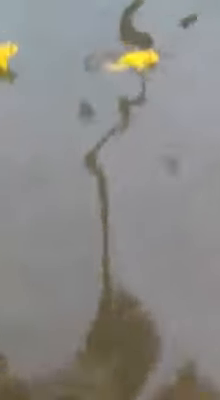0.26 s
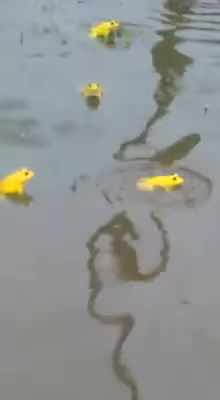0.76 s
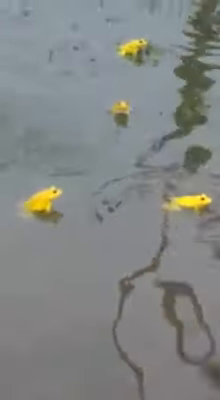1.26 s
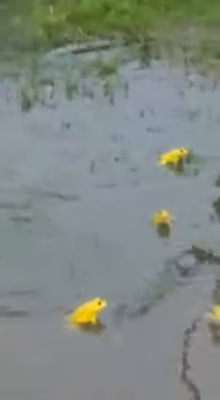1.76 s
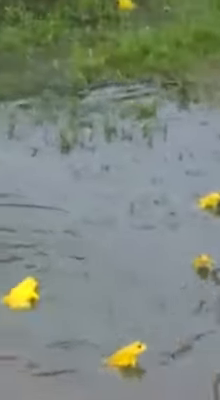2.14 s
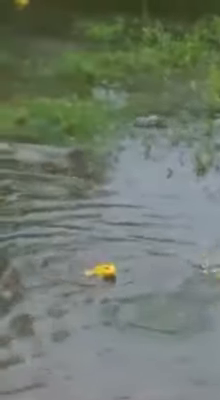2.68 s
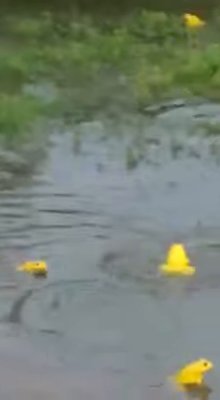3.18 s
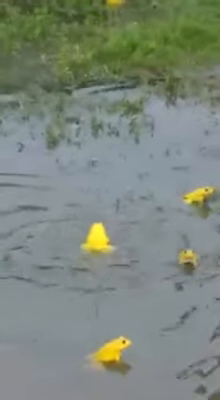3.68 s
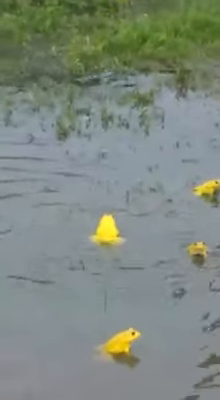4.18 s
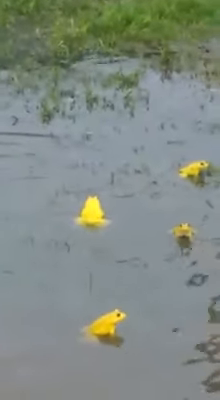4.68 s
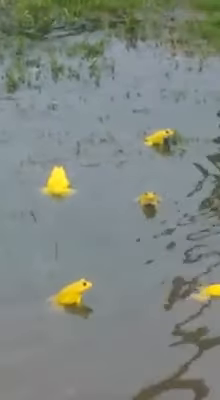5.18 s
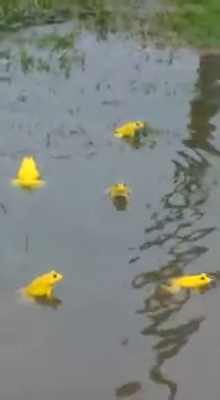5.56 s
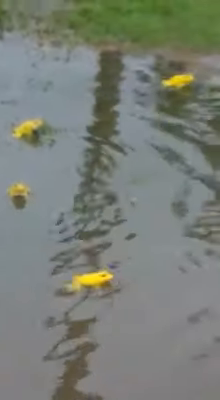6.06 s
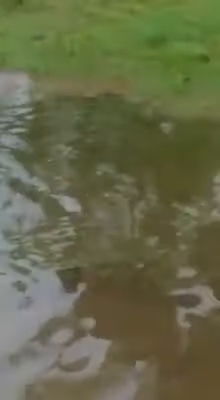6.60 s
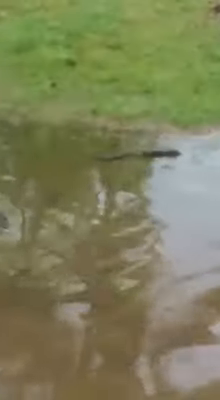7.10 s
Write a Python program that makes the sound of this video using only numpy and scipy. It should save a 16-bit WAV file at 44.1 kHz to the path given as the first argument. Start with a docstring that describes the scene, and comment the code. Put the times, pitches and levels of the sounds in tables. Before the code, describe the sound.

Rough, pulsing frog croaks trade back and forth over shallow water, multiplying into a loud crowded chorus, with faint chirps and hiss behind.

```python
"""Bullfrogs call in a rain-flooded puddle: harsh and round voices trade croaks, and more join as the chorus builds.
Each croak is a slowing train of pulses that ring the throat and vocal sac; farther frogs blur together behind.
A deeper voice throbs underneath in even bouts of short, upward-bending tones.
Frogs splash as they jump, in bursts of crackling noise; raspy chirps, whistles and one long tone come from far off.
Low outdoor air and a thin high hiss over the wet grass are shaped noise."""
import sys
import numpy as np
from scipy import signal
from scipy.fft import rfft, irfft, next_fast_len
from scipy.io import wavfile
from scipy.ndimage import map_coordinates

SR = 44100
rng = np.random.default_rng(int(sys.argv[2]) if len(sys.argv) > 2 else 0)


def to_wav(sig):
    """Store sig (one row per channel, or 1-D mono) as 16-bit WAV at the path in sys.argv[1].

    Samples outside -1..1 are clipped; the rate is SR.
    """
    pcm = np.clip(np.atleast_2d(sig), -1, 1) * 32767
    pcm = np.round(pcm).astype(np.int16)
    wavfile.write(sys.argv[1], SR, pcm.T)  # frames by channels


N = 323694  # length in samples


def amp(db):
    """Amplitude factor for a level in dB."""
    return 10 ** (np.asarray(db) / 20)


def unit(x):
    """Scaled to rms 1."""
    return x / np.sqrt(np.mean(x ** 2) + 1e-20)


def along(points, hz):
    """Read a curve of (Hz, value) points on a log frequency axis."""
    point_hz, value = np.transpose(points)
    return np.interp(np.log(hz + 1), np.log(point_hz + 1), value)


def clock(length_s):
    """Sample times over a length in seconds."""
    return np.arange(int(length_s * SR)) / SR


def curves(rows):
    """One value per sample for each column after the time."""
    time_s, *columns = np.transpose(rows)
    return [np.interp(np.arange(N) / SR, time_s, column) for column in columns]


def wobble(rate):
    """A smooth random curve, rate knots a second."""
    knots = rng.standard_normal(int(N * rate / SR) + 4)
    return map_coordinates(knots, [np.arange(N) * rate / SR])


def filtered(x, response):
    """x times a complex response of frequency."""
    m = next_fast_len(N + SR // 4)
    spectrum = rfft(x, m) * response(np.fft.rfftfreq(m, 1 / SR))
    return irfft(spectrum, m)[..., :N]


def add(track, start_s, sound):
    """Mix a sound into a track from a start time."""
    start = int(np.clip(round(start_s * SR), 0, N))
    track[..., start:start + sound.shape[-1]] += sound[..., :N - start]


def noise(spectrum, apart_db):
    """Stereo noise of rms 1; apart_db is the part that differs between the sides."""
    mid, side = filtered(rng.standard_normal((2, N)), lambda hz: amp(along(spectrum, hz)))
    side = amp(apart_db) * side
    return unit(np.array([mid + side, mid - side]))


def outdoors(x, near_db, near_t60, far_db, far_t60, apart_db=-8):
    """Direct sound, quick scatter from water and bank, and a faint tail from the trees; t60 in s."""
    t = clock(.3)

    def scatter(t60):
        decay = amp(-60 * t / t60) * (t > .001)
        return unit(rng.standard_normal(len(t)) * decay) / np.sqrt(len(t))

    mid, side = [amp(near_db) * scatter(near_t60) + amp(far_db) * scatter(far_t60) for _ in range(2)]
    path = (t == 0) + mid + np.outer([1, -1], amp(apart_db) * side)
    path = path / np.sqrt(np.sum(path ** 2) / 2)
    return signal.fftconvolve(x[None], path, axes=1)


# Spectral shape of the low outdoor air: frequency_hz, relative_density_db (per Hz)
AIR_SPECTRUM = [(25, -16.5), (60, -5), (110, -4), (180, -9), (280, 4.5), (440, -0.5), (620, -8.5),
                (1000, -9.5), (2000, -6), (3400, -14), (4200, -28), (6000, -74)]
# Spectral shape of the thin hiss: frequency_hz, relative_density_db (per Hz)
HISS_SPECTRUM = [(2500, -75), (4300, -5.5), (6700, 1.5), (7900, -7), (8600, 6), (9350, 11.5), (10200, 1),
                 (11400, -15.5), (12700, -10), (15000, -22)]


def background(air_db=-46, hiss_db=-54):
    """Low outdoor air whose level drifts gently, and a steady high hiss."""
    drift_db = 1.0 * wobble(6)
    air = amp(air_db + drift_db) * noise(AIR_SPECTRUM, apart_db=-7.5)
    hiss = amp(hiss_db) * noise(HISS_SPECTRUM, apart_db=-0.5)
    return air + hiss


def croak(length, first_rate, slowing, throat_hz, throat_width, sag, sac_hz, sac_db,
          hollow_db, bright_db, edge_db,
          sac_width=150, sac_sag=0.095, hollow_width=360, bright_width=490):
    """Slowing pulses swell and fade; each rings the sac and a throat whose pitch slides as the air runs out."""
    swell, size_db, stray, jitter_s = .5, 1.35, .014, .0001
    puff, puff_lead_s, sac_lead_s = .55, .0027, .0025
    pulse = np.arange(int(length * first_rate * (1 - slowing / 2)))
    # place in the croak, 0 to 1, at which each pulse falls when the rate drops steadily
    u = (1 - np.sqrt(np.abs(1 - 2 * slowing * pulse / (first_rate * length))))[:, None] / slowing
    late, size, bend, gap, kick = rng.standard_normal((64, 5))[:len(pulse)].T[:, :, None]
    effort = np.abs(np.sin(np.pi * u)) ** swell * amp(size_db * size)
    t = clock(.02)

    def ring(hz, width, db, growth):
        """One soft-edged ring per pulse; growth says how steeply it follows the effort."""
        x = 4 * width * t
        shape = x ** 2 * np.exp(-x)
        shape = shape * np.sqrt(2 * SR / first_rate / np.sum(shape ** 2))
        return amp(db) * effort ** growth * shape * np.sin(2 * np.pi * hz * t)

    slide = 1 + sag * (.5 - u) + stray * bend
    # hollow, throat and two bright resonances: centre_hz, width_hz, level_db, growth
    modes = [(0.704 * throat_hz, hollow_width, hollow_db, 1.05),
             (throat_hz, throat_width, 0, 1),
             (1.267 * throat_hz, bright_width, bright_db, 1.05),
             (3120, 700, edge_db, 1.3)]
    throat = sum(ring(hz * slide, width, db, growth) for hz, width, db, growth in modes)
    sac_slide = 1 + sac_sag * (.5 - u) + 2 * stray * gap
    sac = ring(sac_hz * sac_slide, sac_width, sac_db, growth=0.56)

    opening = u * length + jitter_s * late
    # a usually weaker puff leaks out just before each opening
    puff_at = opening - puff_lead_s * np.exp(0.22 * gap)
    sac_at = opening - sac_lead_s + 2 * jitter_s * bend
    at = np.vstack([opening, puff_at, sac_at])
    sounds = np.vstack([throat, puff * kick * throat, sac])
    places = (np.abs(at + t) * SR + .5).astype(int)
    return np.bincount(places.ravel(), sounds.ravel(), int((length + .05) * SR))


def radiated(x, low_hz=255, high_hz=3500):
    """A frog's small body sends out little bass, and its soft skin little treble."""
    x = signal.sosfilt(signal.butter(N=4, Wn=low_hz, btype="high", fs=SR, output="sos"), x)
    return signal.sosfilt(signal.butter(N=10, Wn=high_hz, fs=SR, output="sos"), x)


# Swelling level of the farther frogs: time_s, level_db
CHORUS_LEVEL = [(0, -59), (1.6, -51.5), (3, -44.5), (3.6, -39.5), (4.4, -35), (5.2, -37.5), (6, -32.5),
                (6.6, -36.5), (7.34, -42)]


def far_frogs(count=44):
    """Farther frogs call at loosely spaced random times and blur into one another."""
    out = np.zeros((2, N))
    for i, (shift, pace, build) in enumerate(rng.uniform(-1, 1, (count, 3))):
        throat_hz = 1540 * (1 + .07 * build)
        call = croak(.34, 67 + 3 * pace, .11, throat_hz, throat_width=470, sag=0.3, sac_hz=394,
                     sac_db=-5.0, hollow_db=-3.0, bright_db=-1.5, edge_db=-18.5)
        start_s = (i + shift / 2) * N / SR / count
        add(out, start_s, outdoors(call, near_db=-2, near_t60=.04, far_db=-6, far_t60=.22, apart_db=-5))
    return unit(radiated(out)) * amp(curves(CHORUS_LEVEL)[0])


def chirp(length, hz, stray, size_db=2, fall=0.021):
    """A quick, slightly falling train of tiny rings that stray in pitch and blend into a rasp."""
    rate, ring_s = 310, .0015  # rings per s, ring width in s
    count = max(int(length * rate), 1)
    size, bend = rng.standard_normal((160, 2))[:count].T
    t = clock(count / rate)
    ring = np.minimum((t * rate).astype(int), count - 1)
    u = t * rate / count  # 0 to 1 through the chirp
    swell = np.sqrt(np.abs(np.sin(np.pi * u)))
    pulses = np.exp(-((t - (ring + .5) / rate) / ring_s) ** 2)
    level = swell * amp(size_db * size[ring]) * pulses
    pitch_hz = hz * (1 + fall * (.5 - u) + stray * bend[ring])
    return unit(level * np.sin(2 * np.pi * np.cumsum(pitch_hz) / SR))


def whistle(length, hz, waver=0.011, waver_rate=8, fall=0.01, companion=.915, companion_db=-3):
    """A clean note wavering in pitch, with a weaker tone just below it."""
    t = clock(length)
    u = t / length
    pitch_hz = hz * (1 + fall * (.5 - u) + waver * np.cos(2 * np.pi * waver_rate * t))
    phase = 2 * np.pi * np.cumsum(pitch_hz) / SR
    notes = np.sin(phase) + amp(companion_db) * np.sin(companion * phase)
    return unit(np.sqrt(np.sin(np.pi * u)) * notes)


# Far high chirps, and in the last row the short high plink of a drop at the splash: start_s, length_s,
# pitch_hz, pitch_scatter (share), level_db (before the shared trim)
FAR_CHIRPS = [(0, 0.086, 2940, .035, -50.5), (1.53, 0.18, 3490, 0.017, -59), (1.7, 0.27, 3280, 0.014, -53),
              (2.003, 0.21, 3426, 0.018, -54), (2.408, 0.24, 3500, 0.033, -52),
              (2.758, 0.21, 3410, 0.0089, -49.5), (3.127, 0.34, 3410, 0.008, -50),
              (3.576, 0.15, 3410, .012, -50), (4.026, 0.16, 3940, 0.037, -50.5),
              (4.036, 0.31, 3476, 0.0085, -52.5), (4.475, 0.2, 3880, 0.048, -52),
              (4.471, 0.17, 3450, .014, -50.5), (5.05, 0.21, 3940, 0.038, -53),
              (5.602, 0.2, 3880, .04, -48.5), (5.998, 0.15, 4300, 0.013, -56.5),
              (6.443, 0.079, 3440, 0.022, -39)]
# Far wavering whistles: start_s, length_s, pitch_hz, level_db (before the shared trim)
FAR_WHISTLES = [(0.972, 0.217, 3720, -52), (1.31, 0.18, 3680, -51)]
# Path of the thin distant tone, before its wavering: time_s, pitch_hz, level_db
LONG_TONE = [(3.65, 723, -82), (3.78, 704, -51), (4.1, 760, -56), (4.27, 783, -38.5), (4.42, 763, -51),
             (4.55, 766, -41.5), (4.8, 755, -44), (4.95, 728, -49.5), (5.1, 690, -80)]


def distant_calls(trim_db=-3):
    """Raspy high chirps, a drop's high plink and whistles smeared by distance, and one long tone wavering in
    pitch and level."""
    out = np.zeros(N)
    for start_s, length, hz, stray, db in FAR_CHIRPS:
        add(out, start_s, amp(db + trim_db) * chirp(length, hz, stray))
    for start_s, length, hz, db in FAR_WHISTLES:
        add(out, start_s, amp(db + trim_db) * whistle(length, hz))
    hz, db = curves(LONG_TONE)
    tone_level = amp(db + 2.4 * wobble(27))
    tone_hz = hz * (1 + 0.0092 * wobble(46))
    tone = tone_level * np.sin(2 * np.pi * np.cumsum(tone_hz) / SR)
    return outdoors(out, near_db=-3, near_t60=.06, far_db=-5, far_t60=.28)[:, :N] + tone


# Bouts of the deep voice: first_throb_s, last_throb_s, pitch_hz (mid-bout), level_db (before the arch)
DEEP_BOUTS = [(0.116, 0.307, 255, -44.5), (0.467, 0.87, 278, -37), (0.957, 1.196, 269, -37.5),
              (1.614, 1.613, 335, -40), (1.675, 1.675, 330, -29), (1.942, 2.17, 264, -37),
              (2.632, 2.89, 297, -34.5), (2.992, 3.407, 268, -36), (4.791, 5.112, 254, -38.5),
              (5.169, 5.72, 248, -44.5), (5.789, 6.23, 241, -39.5), (6.3, 6.934, 280, -35.5),
              (6.39, 6.86, 260, -40)]


def deep_frog(width=0.011, rise=0.1, overtone_db=-24, arch_db=3, sag=0.045):
    """Even bouts of soft throbs, each a few cycles bending upward; a bout swells midway and sinks in pitch."""
    throbs_per_s, jitter_s = 16.2, .0008  # the rate is rounded to fit whole throbs in a bout
    scatter_db, stray = 1, .012
    out = np.zeros(N)
    t = clock(.1) - .05
    for first, last, bout_hz, bout_db in DEEP_BOUTS:
        count = round((last - first) * throbs_per_s) + 1
        for u, (size, bend, late) in zip(np.linspace(0, 1, count), rng.standard_normal((20, 3))):
            hz = bout_hz * (1 + sag * (.5 - u) + stray * bend)
            db = bout_db + arch_db * np.sin(np.pi * u) + scatter_db * size
            phase = 2 * np.pi * hz * (t + rise * t ** 2 / (2 * width))
            tone = np.sin(phase) + amp(overtone_db) * np.sin(2 * phase)
            throb = np.exp(-(t / width) ** 2) * tone
            centre_s = first + u * (last - first) + jitter_s * late
            add(out, centre_s + t[0], amp(db) * throb)
    return outdoors(out, near_db=-12, near_t60=.08, far_db=-11, far_t60=.4)[:, :N]


def around_body(pair, turn, centre_hz=1480, width_hz=270):
    """Sound bending round the microphone body reaches the left port with its phase turned in one band."""
    m = next_fast_len(pair.shape[1])
    hz = np.fft.rfftfreq(m, 1 / SR)
    bend = turn * np.exp(-((hz - centre_hz) / width_hz) ** 2)
    return irfft(rfft(pair, m) * np.exp(1j * np.outer([1, 0], bend)), m)


# Kinds of voice by name, levels against the throat: throat_width_hz, throat_sag (share), sac_hz,
# hollow_db, bright_db, edge_db, port_phase_turn_rad
FROG_VOICES = {"harsh": (364, 0.24, 414.5, -10, -5.5, -17.5, 3),
               "round": (251, -0.01, 420.5, -16, -12, -36.5, 2),
               "hollow": (310, -0.03, 420, -4, -6, -19, 3), "falling": (262, 0.3, 410, -15, -9, -25, 1.5),
               "shrill": (300, 0.48, 416, -12, -4.5, -15.5, 3),
               "thin": (397, 0.44, 392, -11, -3.5, -7, 9.5),
               "booming": (324, 0.35, 345, -3.5, -3.5, -16.5, -8)}
# Croaks of the near frogs: start_s, length_s, voice, first_pulses_per_s, slowing (share of that rate
# lost by the end), throat_hz, level_db, sac_db (against the throat)
NEAR_CROAKS = [(0.204, 0.23, "thin", 70, 0.13, 1660, -51.5, -5),
               (0.343, 0.22, "round", 63, .11, 1350, -48.5, 6),
               (0.637, 0.26, "thin", 70, .11, 1680, -45.5, 0),
               (0.735, 0.26, "thin", 62, 0.12, 1610, -45.5, -2.5),
               (0.979, 0.23, "round", 56, 0.1, 1500, -56, -2.5),
               (1.158, 0.28, "harsh", 83, .11, 1850, -44, -2.5),
               (1.389, 0.22, "round", 76, 0.12, 1760, -49.5, 1.5),
               (1.788, 0.24, "harsh", 67.5, 0.11, 1635, -35, -10),
               (1.958, 0.23, "round", 86, 0.094, 1670, -45.5, -0.5),
               (2.2, 0.24, "harsh", 70.5, 0.1, 1680, -34.5, -10),
               (2.436, 0.22, "falling", 66.5, .065, 1570, -33, -8.5),
               (2.702, 0.235, "hollow", 65.3, .09, 1640, -33.5, -13),
               (3.012, 0.25, "round", 74, 0.1, 1610, -30.5, -9),
               (3.244, 0.19, "hollow", 65.4, .11, 1690, -33.5, -9.5),
               (3.47, 0.23, "harsh", 62.4, 0.12, 1570, -34, -5.5),
               (3.485, 0.2, "round", 73, 0.052, 1560, -29.5, -6.5),
               (3.634, 0.26, "round", 59.4, 0.029, 1580, -34, -12.5),
               (3.711, 0.22, "harsh", 72, 0.16, 1620, -35, -17),
               (3.912, 0.26, "round", 80, .14, 1475, -30, -8.5),
               (4.031, 0.21, "harsh", 62.2, 0.15, 1690, -31.5, -13),
               (4.071, 0.2, "round", 68, 0.16, 1574, -32, -18),
               (4.25, 0.28, "harsh", 73.5, 0.12, 1590, -34, -7.5),
               (4.215, .18, "round", 73, 0.12, 1550, -38.5, -8),
               (4.427, 0.221, "booming", 70.4, 0.051, 1480, -36, -1.5),
               (4.479, 0.23, "round", 64, 0.068, 1604, -31.5, -13.5),
               (4.669, 0.23, "round", 59, 0.021, 1540, -30, -15.5),
               (4.759, 0.23, "harsh", 76, 0.14, 1610, -31.5, -10.5),
               (4.929, 0.18, "round", 65, 0.053, 1540, -33.5, -12),
               (5.054, 0.2, "round", 74, .11, 1500, -31, -11),
               (5.074, 0.16, "harsh", 81, 0.12, 1740, -35, -7),
               (5.173, 0.27, "round", 67.6, .13, 1500, -32, -9),
               (5.281, 0.36, "harsh", 80, 0.12, 1640, -32.5, -9),
               (5.42, 0.23, "shrill", 68.2, 0.17, 1820, -28.5, -12),
               (5.437, 0.23, "round", 77, 0.16, 1545, -31.5, -12),
               (5.56, 0.16, "round", 85, .11, 1515, -32.5, -13),
               (5.642, 0.15, "harsh", 73, 0.081, 1750, -37.5, -14),
               (5.764, 0.3, "round", 73.4, .1, 1440, -31, -13.5),
               (5.777, 0.3, "booming", 69, 0.13, 1586, -33.5, -3.5),
               (5.9, 0.18, "thin", 79, 0.12, 1790, -37.5, -1),
               (5.956, 0.33, "round", 66, 0.12, 1520, -31, -8.5),
               (6.129, 0.2, "shrill", 72, 0.1, 1767, -27, -14),
               (6.221, 0.19, "round", 68, 0.13, 1740, -35, -2),
               (6.397, 0.32, "round", 78, 0.17, 1504, -33, -7.5),
               (6.418, 0.14, "harsh", 63.4, 0.061, 1480, -37, -8),
               (6.584, 0.18, "round", 65, 0.015, 1500, -35.5, -4),
               (6.716, 0.24, "harsh", 66, 0.12, 1640, -36.5, -7),
               (6.739, 0.31, "round", 72, 0.071, 1500, -35, -10),
               (7.06, 0.22, "round", 70, 0.12, 1477, -34, -5.5),
               (7.192, 0.23, "booming", 67, 0.026, 1470, -38.5, -3)]


def near_frogs():
    """Each voice has its own phase turn between the ports; fainter callers sit farther off and blur more."""
    close_db = -21  # a croak at this level gains no extra blur
    blur_grows = .45  # dB of scatter and tail gained per dB below that
    out = np.zeros((2, N))
    for start_s, length, voice, rate, slowing, throat_hz, db, sac_db in NEAR_CROAKS:
        throat_width, sag, sac_hz, hollow_db, bright_db, edge_db, turn = FROG_VOICES[voice]
        call = amp(db) * croak(length, rate, slowing, throat_hz, throat_width, sag, sac_hz, sac_db,
                               hollow_db, bright_db, edge_db)
        blur_db = blur_grows * (close_db - db)
        pair = outdoors(call, near_db=blur_db - 9.5, near_t60=.024,
                        far_db=blur_db - 18, far_t60=.25, apart_db=-3)
        add(out, start_s, around_body(pair, turn))
    return radiated(out)


# Spectral shape of the spray: frequency_hz, relative_density_db (per Hz)
SPRAY_SPECTRUM = [(300, -25), (1200, 6), (3400, 11.5), (4400, 11), (9000, 11), (14000, 1.5)]
# Splashes and drops: peak_s, rise_s (growth by a factor e), t60_s, level_db
SPLASH_EVENTS = [(0.208, 0.0034, 0.18, -46.5), (0.241, 0.0039, 0.081, -51), (.69, 0.2, 0.74, -51),
                 (2.876, 0.0016, 0.028, -32.5), (2.914, 0.025, 0.17, -46.5), (3.805, .003, .04, -50),
                 (4.722, .002, 0.026, -48), (4.757, .002, .03, -46), (5.005, .003, 0.04, -50),
                 (5.669, 0.0018, 0.064, -41.5), (6.438, 0.0047, 0.52, -57), (6.468, 0.00045, 0.015, -37),
                 (6.501, 0.031, 0.3, -48.5)]


def splashes(spiky_db=4):
    """A jump throws up a burst of spray: noise made to crackle by fast random level swings."""
    level, t = np.zeros(N), np.arange(N) / SR
    for peak_s, rise, t60, db in SPLASH_EVENTS:
        decay = amp(db - 60 * np.maximum(t - peak_s, 0) / t60)
        level += decay * np.exp(np.minimum(t - peak_s, 0) / rise)
    crackle = amp(spiky_db * wobble(900))
    return level * unit(noise(SPRAY_SPECTRUM, apart_db=-5.5) * crackle)


def scene():
    """The puddle, its frogs and the air around them."""
    return background() + far_frogs() + distant_calls() + deep_frog() + near_frogs() + splashes()


# Tone difference of the two microphone ports: frequency_hz, left_minus_right_db
PORT_TONE = [(60, -14.5), (110, 4), (200, -8.5), (700, -5.5), (1300, -9), (2400, -6.5), (4400, 3.5),
             (8000, 5.5)]


def record(dry):
    """Two unlike microphone ports: the right hears more body, the left more treble; a band limit cuts the top."""
    top_hz = 15150

    def ports(hz):
        ratio = amp(along(PORT_TONE, hz))
        sides = np.array([ratio, np.ones_like(hz)])
        return sides * np.sqrt(2 / (1 + ratio ** 2)) * (hz < top_hz)

    return filtered(dry, ports)


dry = scene()
out = record(dry)
to_wav(out)
```